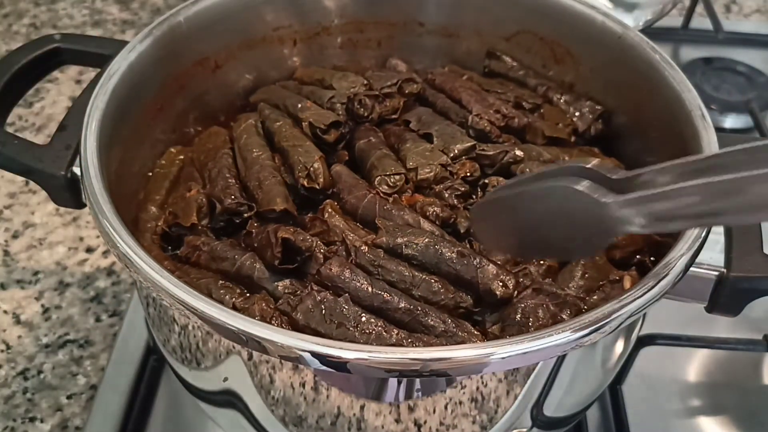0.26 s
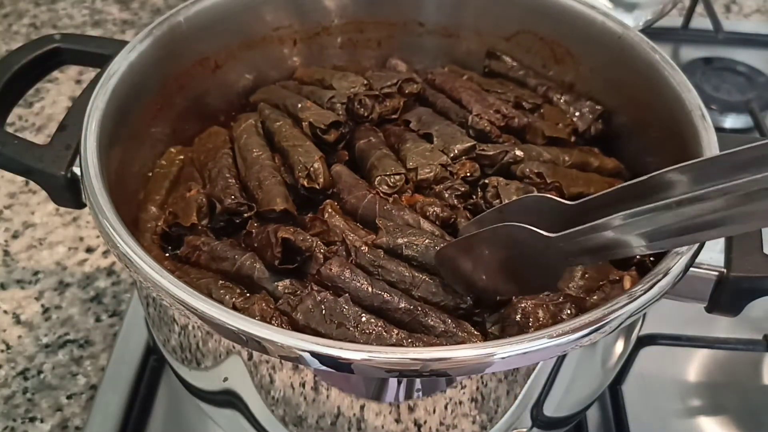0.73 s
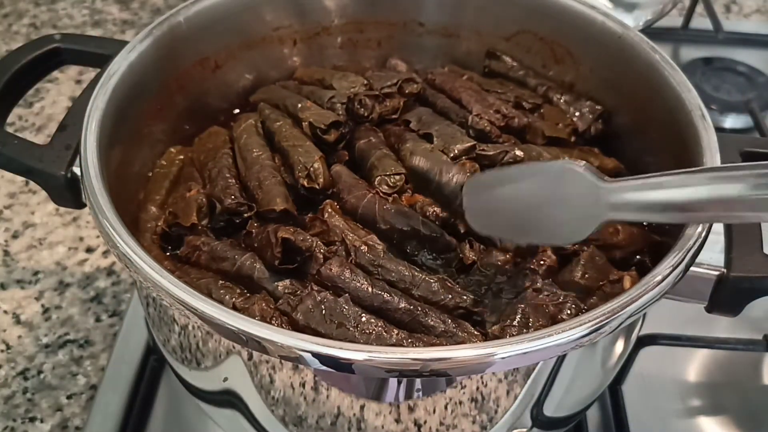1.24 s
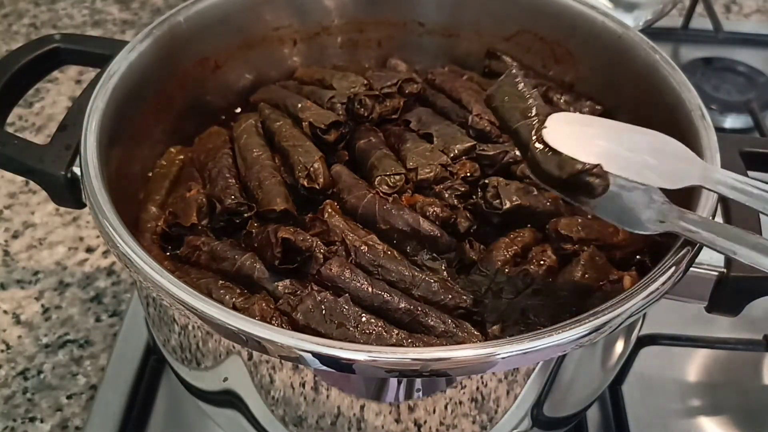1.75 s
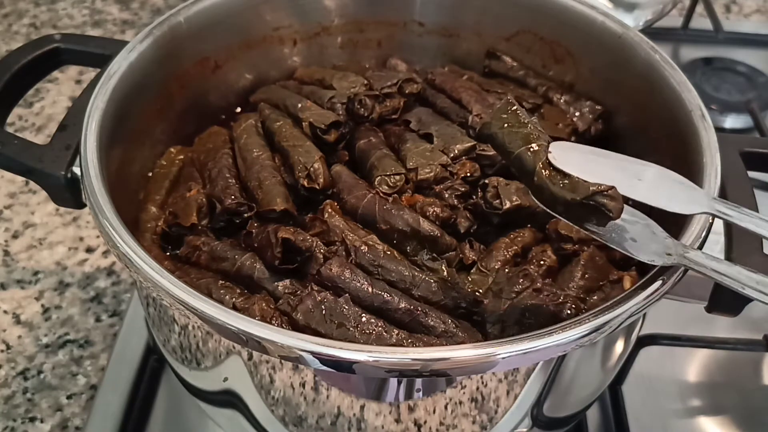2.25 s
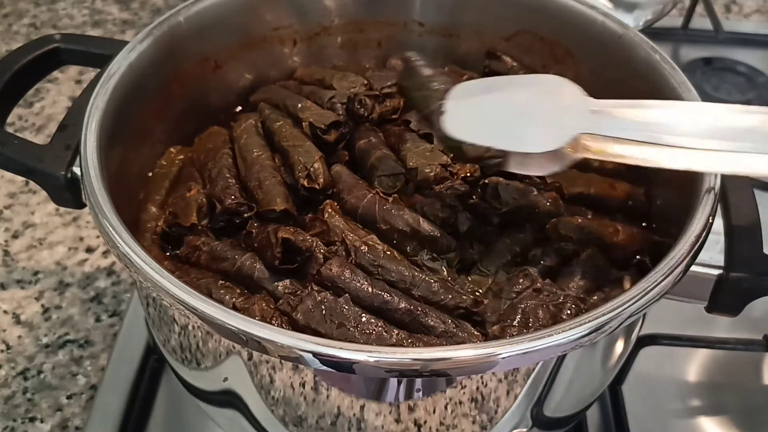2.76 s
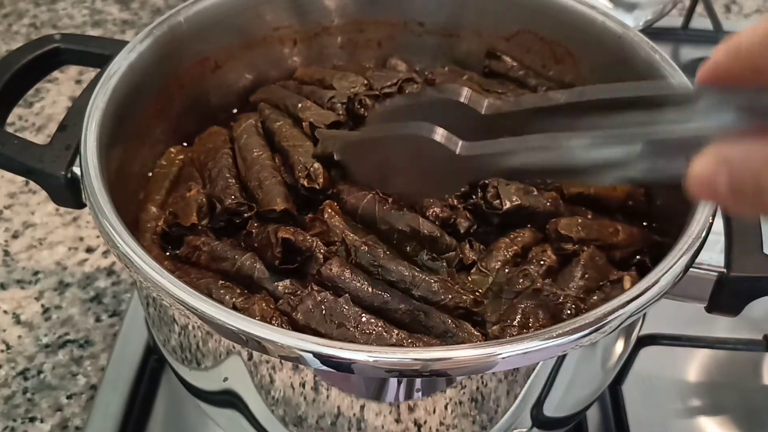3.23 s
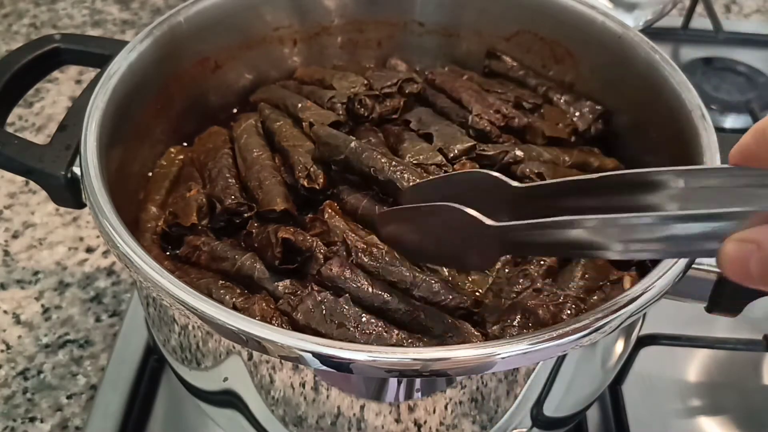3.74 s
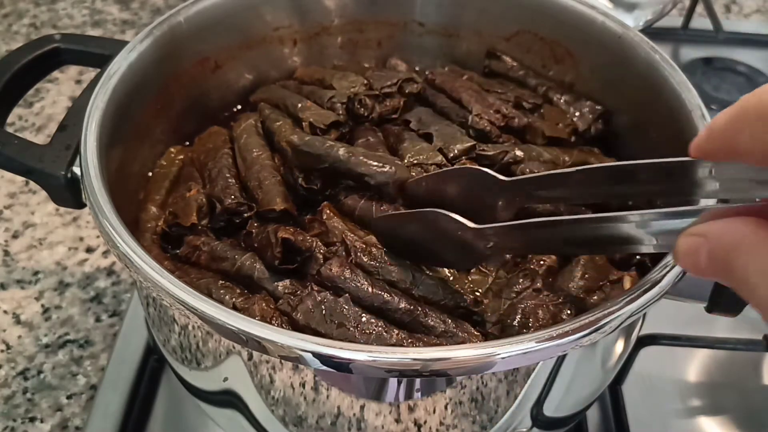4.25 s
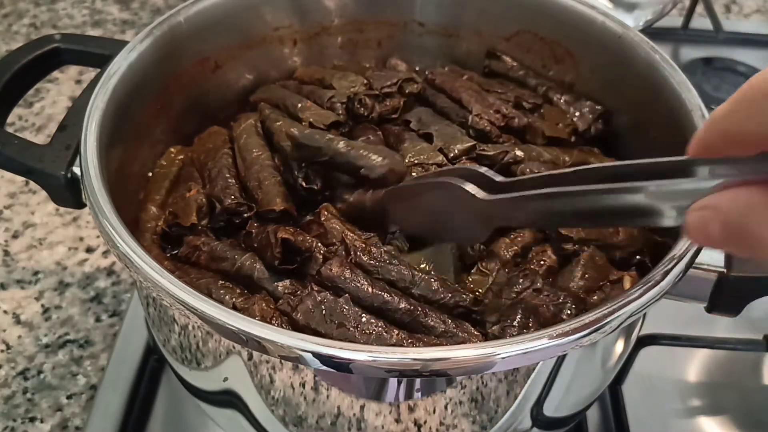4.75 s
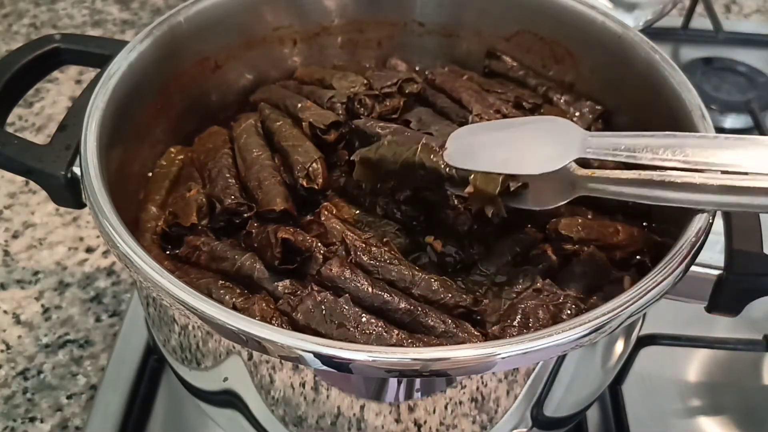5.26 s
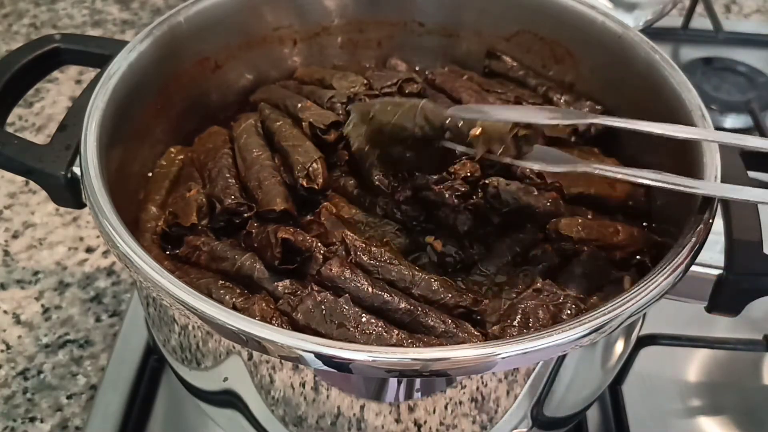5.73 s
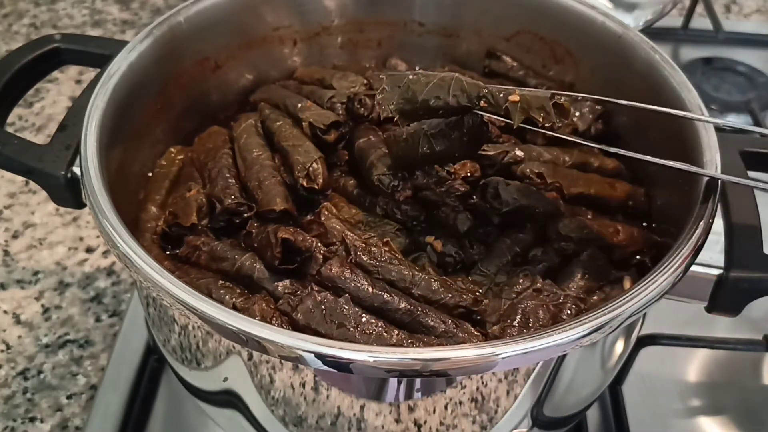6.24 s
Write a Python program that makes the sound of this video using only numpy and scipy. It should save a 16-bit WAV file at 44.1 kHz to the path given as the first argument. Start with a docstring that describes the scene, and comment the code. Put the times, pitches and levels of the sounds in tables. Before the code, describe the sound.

A few sharp metal tong clicks and tiny wet crackles of food in a steel pot, with appliances humming softly behind.

```python
"""Steel tongs pick stuffed leaves out of a steel pot in a small kitchen.
From the start, appliances hum over a fine hiss and the tong blades rub faintly. After a second the
wet leaves crackle and the steel clicks and rings three times. Near the middle a low drone stops;
the leaf rolls peel apart, the blades slide between them, and two more clicks follow near the end.
A noise suppressor opens after each loud click, so the hum swells for a moment."""
import sys
import numpy as np
from scipy import signal
from scipy.fft import rfft, irfft, next_fast_len
from scipy.io import wavfile

SR = 44100
rng = np.random.default_rng(int(sys.argv[2]) if len(sys.argv) > 2 else 0)


def persist_wave(psi):
    """Save psi, clipped to +-1, as 16-bit WAV."""
    counts = np.round(np.clip(psi, -1, 1) * 32767).astype(np.int16)
    wavfile.write(sys.argv[1], SR, np.atleast_2d(counts).T)


N = 286323
T = np.arange(N) / SR

# Each click of the tongs has its own tone colour, a low knock and two favoured rings:
# (time [s], relative level [dB], slip time [s], low boost [dB], high boost [dB], knock pitch [Hz],
#  relative knock level [dB], ring pitch [Hz], ring level [dB], high ring pitch [Hz], its level [dB])
CLICKS = [(1.1464, -39.5, 0.017, 12.5, -18.5, 1700, -44.5, 4800, -34, 7240, -43),
          (1.7667, -23, 0.0039, -4.5, 3.5, 1053, -44, 6200, -22, 8070, -29),
          (2.7204, -31.5, 0.0074, 0, 2.5, 1607, -45, 4956, -35, 7710, -31.5),
          (5.1707, -30, 0.0065, 3.5, -2.5, 1542, -43.5, 4440, -37.5, 5107, -39),
          (5.7246, -44, 0.0028, 7, -1.5, 1500, -63, 8460, -43.5, 6220, -50)]


def from_db(db):
    """Turn decibels into a factor to multiply by."""
    return 10 ** (np.asarray(db) / 20)


def rms_one(x):
    """Scale a sound so that its average strength (rms) is 1."""
    return x / np.sqrt(np.mean(x ** 2) + 1e-20)


def at_hz(points, hz):
    """Read between (frequency [Hz], value) rows, with octaves evenly spaced."""
    f, value = np.transpose(points)
    return np.interp(np.log(np.maximum(hz, 1)), np.log(f), value)


def coloured(x, spectrum):
    """Filter a sound by (frequency [Hz], gain [dB]) rows."""
    return irfft(rfft(x) * from_db(at_hz(spectrum, np.fft.rfftfreq(len(x), 1 / SR))), len(x))


def noise(spectrum, size):
    """Noise of strength 1 with the given tone colour."""
    return rms_one(coloured(rng.standard_normal(next_fast_len(size)), spectrum)[:size])


def drift(rate):
    """Glide between random values of about -1 to 1, rate times a second."""
    knots = rng.standard_normal(1024)
    return np.interp(T * rate, np.arange(len(knots)), knots)


def lag(x, seconds):
    """Follow x smoothly and a little late."""
    r = np.exp(-1 / (seconds * SR))
    return signal.lfilter([1 - r], [1, -r], x + 1e-18)


def dying(t, t60):
    """A fade that falls 60 dB in t60 seconds, the fade time."""
    return np.exp(-np.log(1000) * t / t60)


def add(out, s, sound):
    """Mix a sound in at s seconds."""
    part = out[round(s * SR):][:len(sound)]
    part += sound[:len(part)]


def strokes(rows, rise):
    """Swells that climb and fall 20 dB within their length; rise is the share spent climbing."""
    return sum(from_db(db - 20 * np.minimum(np.maximum((s - T) / rise, (T - s) / (1 - rise)) / span, 10))
               for s, db, span in rows)


def appliances(air_db=-65, drone_hz=52.6, drone_db=-74, drone_stop_s=3.2, beat_peak_s=.33):
    """Motors hum over a soft rush of air; two close pitches throb together and a low drone stops."""
    # motor and mains tones: (pitch [Hz], level [dB], waver [dB])
    motors = [(48.8, -83.5, 2.5), (198.2, -81.5, 4), (300.7, -79, -1), (400.4, -79.5, 2.5),
              (443.3, -68, 0.5), (530, -112.5, -11), (645, -84, 2.5)]
    # rush of kitchen air: (frequency [Hz], relative level [dB])
    air_colour = [(25, -37), (45, -4), (65, -7), (85, -4), (120, 0.5), (150, -3), (230, -1.5), (330, -4.5),
                  (480, -1.5), (620, -7.5), (1000, -11.5), (1600, -17), (2600, -27), (4000, -31.5)]
    tone = lambda hz, phase: np.sqrt(2) * np.cos(2 * np.pi * hz * T + phase)
    hum = sum(from_db(db + waver * drift(7)) * tone(hz, 0.78 * drift(4)) for hz, db, waver in motors)
    beat = sum(from_db(db) * tone(hz, 0.43 * drift(18) - 2 * np.pi * hz * beat_peak_s)
               for hz, db in [(98.5, -69.5), (99.812, -72.5)])   # two motors near twice the mains rate
    running = dying(np.maximum(T - drone_stop_s, 0), t60=.4)
    drone = from_db(drone_db) * running * tone(drone_hz, .4 * drift(3))
    air = from_db(air_db) * noise(air_colour, N)
    return hum + beat + drone + air


def hiss(level_db=-71.5, waver_db=3.6):
    """A fine hiss that wavers a little and now and then swells."""
    # tone colours of the hiss and its swells: (frequency [Hz], relative level [dB])
    hiss_colour = [(1800, 1.5), (2500, -3), (3500, 0.5), (4300, 6), (5000, 2.5), (6000, -3), (7000, -2.5),
                   (7900, 3.5), (9200, -9), (12000, -27.5), (14500, -3), (15700, -6.5)]
    swell_colour = [(1800, -16.5), (2600, -9.5), (3300, -3.5), (4600, -2.5), (6200, -6.5), (8000, -1.5),
                    (9500, -12), (12000, -20.5), (14500, -9.5)]
    # soft swells: (peak time [s], level [dB], length [s])
    swells = [(1.49, -70.5, 0.55), (2.24, -64.5, 0.42), (5.42, -66.5, 1)]
    steady = from_db(level_db + waver_db * drift(5.57)) * noise(hiss_colour, N)
    return steady + strokes(swells, rise=0.61) * noise(swell_colour, N)


def rubbing(grain_db=-3.0, pivot_hz=6500):
    """Uneven friction keeps the blades faintly ringing; a bright rub favours their high tones."""
    # tones that rubbing brings out: (pitch [Hz], width [Hz], relative level [dB])
    blade = [(2670, 810, -14.5), (4850, 260, 5), (6100, 400, -3), (7440, 940, -4), (8960, 360, -1.5),
             (10650, 560, -14), (14450, 1100, -10)]
    # rubs as the grip changes: (peak time [s], level [dB], length [s], brightness [dB per octave])
    rubs = [(0.095, -71.5, 0.15, 12), (0.628, -68.5, 0.12, 8), (0.88, -72, 0.087, 6),
            (1.979, -61.5, 0.12, -2), (2.002, -55, 0.015, 4), (2.041, -58.5, 0.034, 0),
            (2.497, -56.5, 0.01, 3), (2.512, -53.5, 0.051, 1.5), (3.88, -72, 0.66, -7),
            (5.807, -68, .04, 13), (5.84, -66.5, 0.16, -4), (5.972, -67.5, 0.16, 0)]
    friction = rng.standard_normal(N) * from_db(grain_db * drift(120))
    rings = [from_db(db) * (-1) ** k * signal.lfilter(*signal.iirpeak(hz, hz / width, fs=SR), friction)
             for k, (hz, width, db) in enumerate(blade)]
    octaves = np.log2(np.array(blade)[:, 0] / pivot_hz)
    return sum(strokes([stroke], rise=0.53) * rms_one(from_db(bright * octaves) @ rings)
               for *stroke, bright in rubs)


def leaves(snap_db=-7.0, snap_t60=0.0054, side_db=-20, grain_db=2.5):
    """Films of sauce burst in tiny snaps; peeling rolls fizz and sliding blades swish."""
    # wet leaves parting: (time [s], relative level [dB], centre frequency [Hz])
    snaps = [(1.0575, -49, 8000), (2.9537, -54, 14000), (3.025, -53, 7000), (3.0919, -44, 8500),
             (3.0935, -42, 14500), (3.1702, -51, 13500), (4.0617, -53, 13500), (4.1345, -52, 8500),
             (4.2565, -48, 14000), (4.7496, -55, 14500)]
    # rolls peeling apart, blades sliding between them: (peak time [s], level [dB], length [s])
    peels = [(1.21, -63.5, 0.29), (3.102, -72, 0.45), (3.26, -76.5, .2)]
    slides = [(4.474, -62, 0.29)]
    # their tone colours: (frequency [Hz], relative level [dB])
    peel_colour = [(3000, -14), (4500, -7), (6500, -12), (7900, 0), (9200, -14), (12000, -23),
                   (14500, -10.5)]
    slide_colour = [(1500, -31), (2600, -4), (3600, 1.5), (4900, -1), (6300, -12), (8000, -3.5),
                    (10000, -24), (15000, -24)]
    out, t = np.zeros(N), T[:SR // 20]
    for s, db, hz in snaps:
        snap = noise([(hz / 2, side_db), (hz, 0), (hz * 2, side_db)], len(t))
        add(out, s, from_db(db + snap_db) * dying(t, snap_t60) * snap)
    grain = from_db(grain_db * drift(150))
    swish = strokes(slides, rise=0.15) * noise(slide_colour, N)
    fizz = strokes(peels, rise=0.15) * noise(peel_colour, N)
    return out + grain * (swish + fizz)


def contact_colour(low_db, high_db, low_hz=1750, high_hz=8800):
    """Tone colour of one click: the steel's body sets the lows, its edge the highs."""
    return [(low_hz / 2, low_db), (low_hz * 2, 0),
            (high_hz / np.sqrt(2), 0), (high_hz * np.sqrt(2), high_db)]


def tong_clicks(ring_db=-1.0, sheet_db=-3.5, sheet_t60=0.031, build_share=0.12, bite_s=0.00042):
    """Steel catches and slips for an instant, which sets it ringing; the thin sheet adds a crack."""
    # natural tones of the steel: (pitch [Hz], relative level [dB], fade time [s])
    steel = [(3130, -17, .035), (4050, -14, .05), (4400, -14, .035), (4690, -9, .04), (4910, -3, .04),
             (5030, -4, .045), (5390, -11, .04), (5750, -14, .03), (6000, -6, .04), (6100, -6, .04),
             (6450, -9, .04), (7200, -11, .035), (7490, -9, .03), (7740, -9, .035), (8040, -4, .035),
             (8430, -6, .04), (8700, -11, .03), (9010, -10, .04), (10600, -19, .025), (11530, -12, .02),
             (12200, -16, .025), (13100, -15, .02), (13900, -11, .02), (14550, -8, .025),
             (15200, -14, .022)]
    # the sheet's ringing, so dense that it is noise: (frequency [Hz], relative level [dB])
    sheet = [(50, -49), (200, -2.5), (600, -8.5), (1300, -15), (2100, -14.5), (3600, -7.5), (4800, 1.5),
             (6800, 2.5), (8600, -1), (10000, -3.5), (12500, -5), (14500, 5), (16000, 3)]
    out, t = np.zeros(N), T[:SR // 4]
    for s, db, slip, low_db, high_db, *_ in CLICKS:
        colour = contact_colour(low_db, high_db)
        build = 1 - np.exp(-t / (build_share * slip))
        phases = rng.uniform(0, 2 * np.pi, len(steel))
        shifts = rng.normal(1, .004, len(steel))   # the grip's pressure shifts each pitch a little
        ring = sum(from_db(level + at_hz(colour, hz)) * dying(t, t60)
                   * np.sin(2 * np.pi * hz * shift * t + phase)
                   for (hz, level, t60), phase, shift in zip(steel, phases, shifts))
        crack = coloured(noise(sheet, len(t)), colour) * dying(np.maximum(t - slip, 0), sheet_t60)
        bite = 1 - np.exp(-t / bite_s)
        add(out, s, from_db(db) * (from_db(ring_db) * build * ring + from_db(sheet_db) * bite * crack))
    return out


def tong_rings(build_s=0.00086, ring_t60=0.034, high_t60=0.07):
    """Each click also starts a hollow knock in the arms, a ping at the edge and two clear rings."""
    # tones of the bending arms: (pitch [times the knock pitch], relative level [dB], fade time [s])
    arms = [(.745, -6, 0.08), (1, -0.5, 0.039), (1.761, -1, 0.024)]
    # short bright tones of the blade's edge: (pitch [Hz], relative level [dB], fade time [s])
    edge = [(11610, -5, 0.015), (14660, -2, .013)]
    out, t = np.zeros(N), T[:SR // 2]
    for s, level_db, _, _, edge_db, knock_hz, knock_db, ring_hz, ring_db, high_hz, high_db in CLICKS:
        tones = [(knock_hz * ratio, knock_db + db, t60) for ratio, db, t60 in arms]
        tones += [(hz, level_db + edge_db + db, t60) for hz, db, t60 in edge]
        tones += [(ring_hz, ring_db, ring_t60), (high_hz, high_db, high_t60)]
        ring = sum(from_db(db) * dying(t, t60) * np.sin(2 * np.pi * hz * t) for hz, db, t60 in tones)
        add(out, s, (1 - np.exp(-t / build_s)) * ring)
    return out


def kitchen(x, tail_db=-7.0, build_s=0.0034, echo_s=.0125, echo_db=-15):
    """One echo off the wall behind the stove, and a tail of many echoes whose highs die first."""
    # how long the room rings: (frequency [Hz], fade time [s])
    room_fades = [(200, 0.71), (1500, 0.4), (5000, 0.23), (9000, 0.25), (15000, 0.16)]
    centres, t60s = np.transpose(room_fades)
    t = T[:SR // 2]
    white, hz = rfft(rng.standard_normal(len(t))), np.fft.rfftfreq(len(t), 1 / SR)
    tail = sum(irfft(white * at_hz(list(zip(centres, share)), hz), len(t)) * dying(t, t60)
               for share, t60 in zip(np.eye(len(centres)), t60s))
    tail = rms_one(tail * (1 - np.exp(-t / build_s))) / np.sqrt(len(t))
    echo = np.interp(T - echo_s, T, x)
    return x + from_db(echo_db) * echo + from_db(tail_db) * signal.fftconvolve(x, tail)[:N]


def scene():
    """Tongs and food echo in the kitchen, with hum and hiss behind them."""
    handling = tong_clicks() + tong_rings() + rubbing() + leaves()
    return (kitchen(handling) + appliances() + hiss())[None]


def suppressor(x, threshold_db=-54, ramp_db=8, open_db=9.5, release_s=0.017, lag_s=.027):
    """Loud highs turn the whole sound up; the boost comes a little late, then sinks back."""
    treble = signal.sosfilt(signal.butter(2, 2000, "high", fs=SR, output="sos"), x)
    level_db = 10 * np.log10(lag(treble ** 2, 0.01) + 1e-14)
    opening = np.clip((level_db - threshold_db) / ramp_db, 1e-6, 1)
    # catch each peak and let it fade
    held = np.exp(np.maximum.accumulate(np.log(opening) + T / release_s) - T / release_s)
    return x * from_db(open_db * lag(lag(held, lag_s), lag_s))


def record(dry, bass_hz=38, top_hz=15600):
    """The noise suppressor acts, then the deepest bass and the very top are cut."""
    bass_cut = signal.butter(4, bass_hz, "high", fs=SR, output="sos")
    top_cut = signal.ellip(12, .2, 80, top_hz, fs=SR, output="sos")
    return signal.sosfilt(np.vstack([bass_cut, top_cut]), suppressor(dry[0]))[None]


dry = scene()
out = record(dry)
persist_wave(out)
```